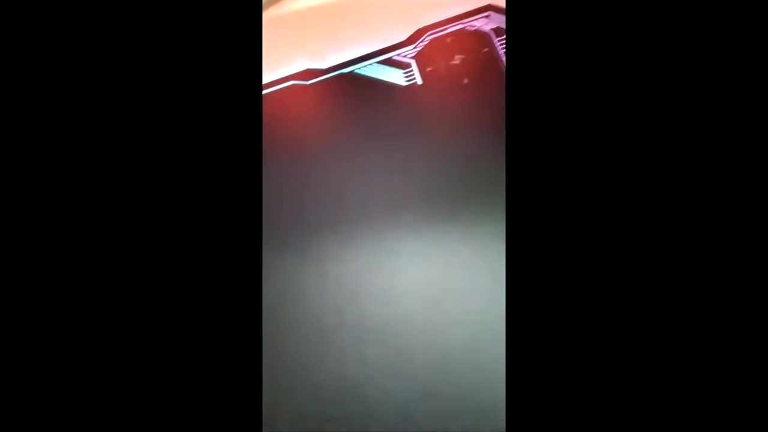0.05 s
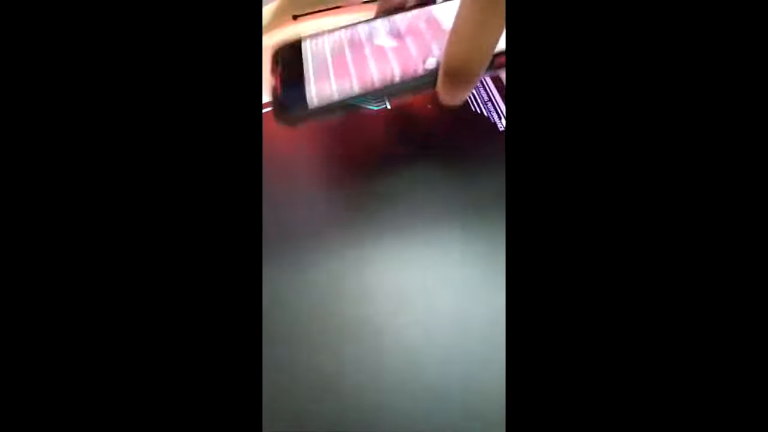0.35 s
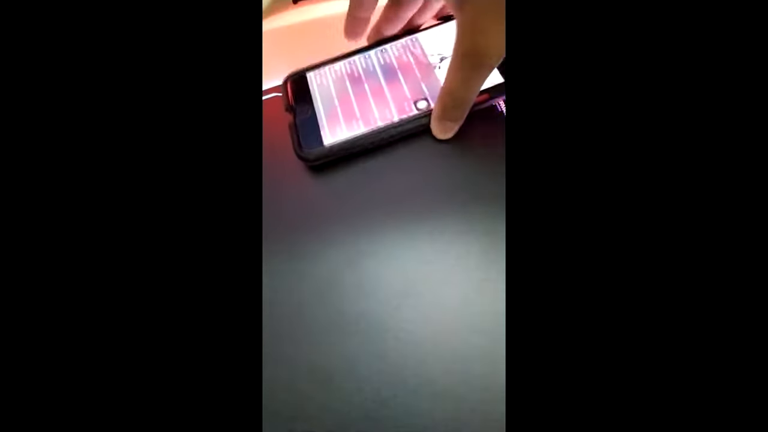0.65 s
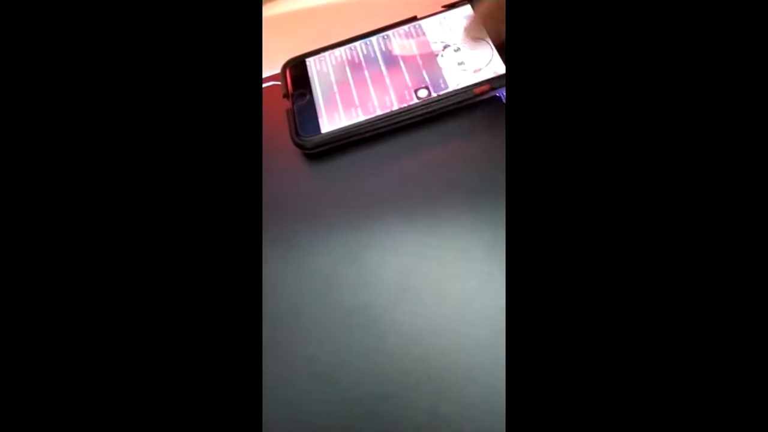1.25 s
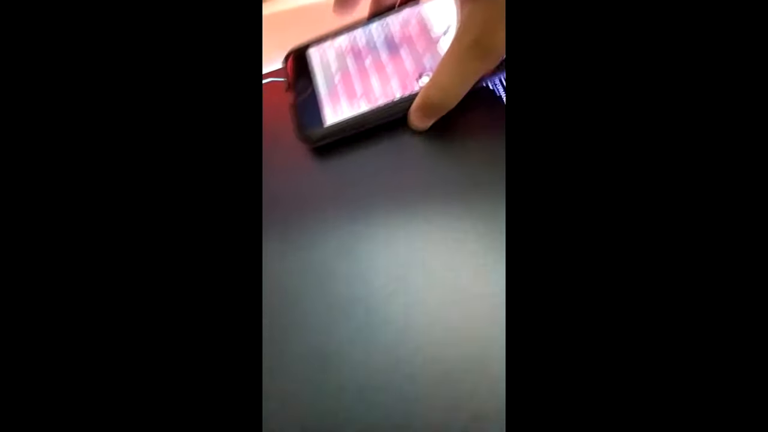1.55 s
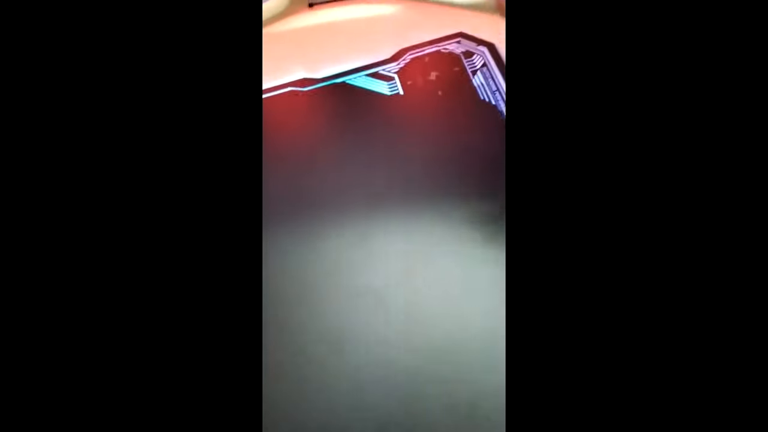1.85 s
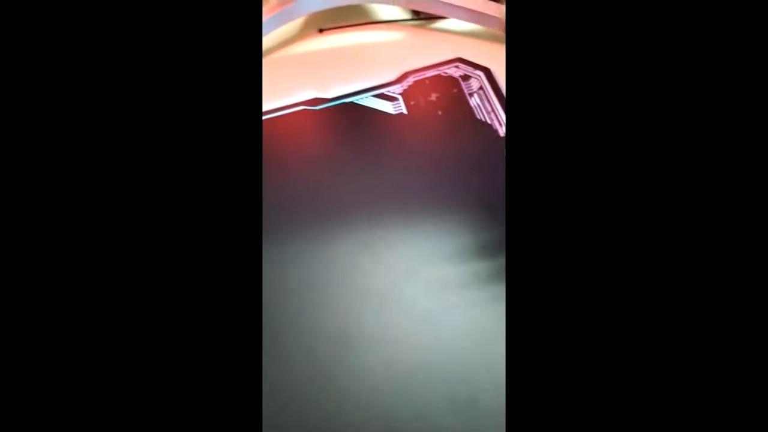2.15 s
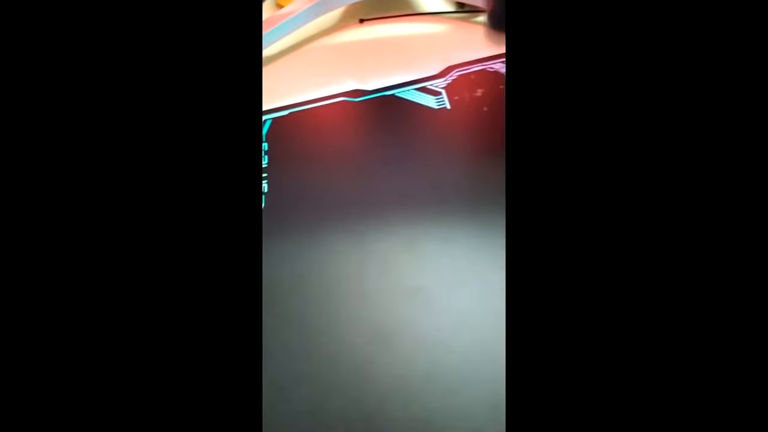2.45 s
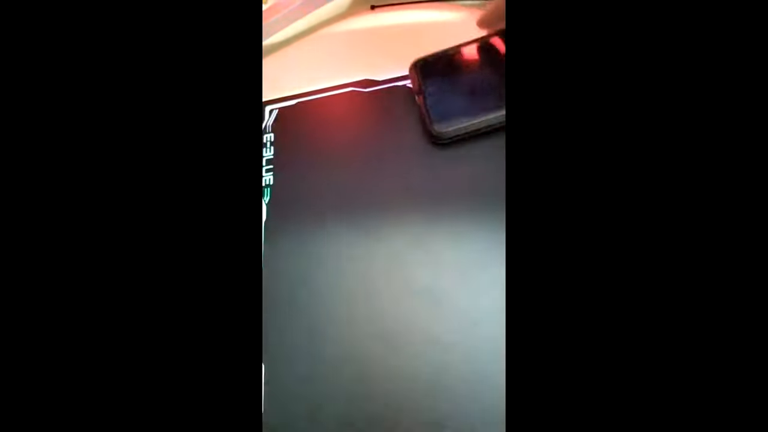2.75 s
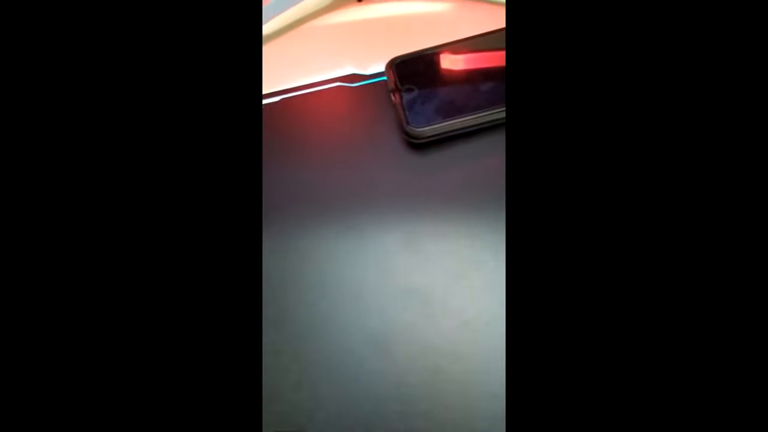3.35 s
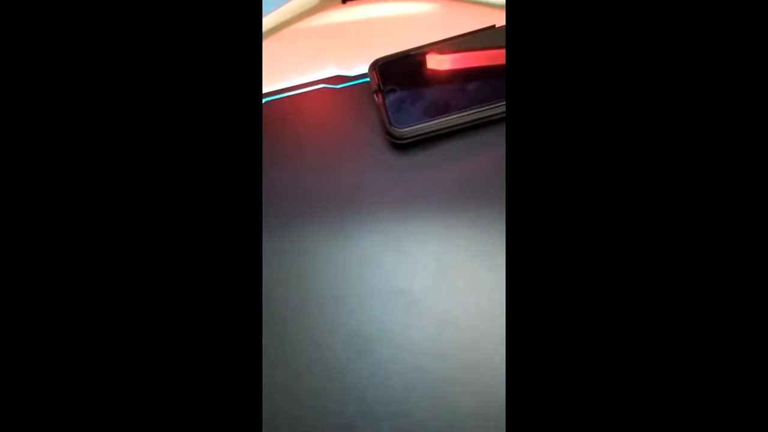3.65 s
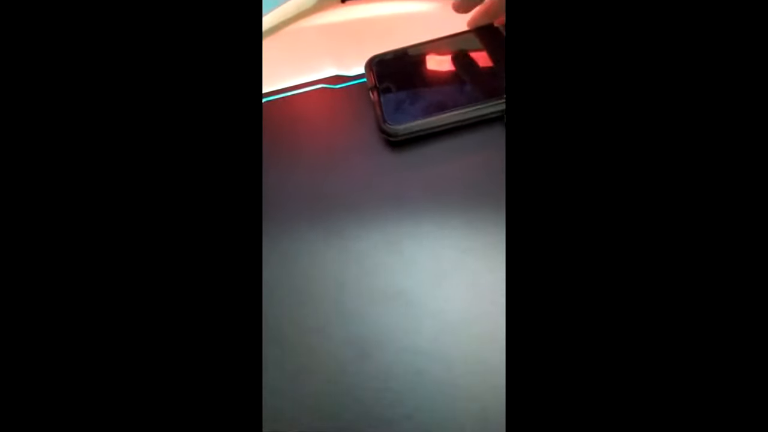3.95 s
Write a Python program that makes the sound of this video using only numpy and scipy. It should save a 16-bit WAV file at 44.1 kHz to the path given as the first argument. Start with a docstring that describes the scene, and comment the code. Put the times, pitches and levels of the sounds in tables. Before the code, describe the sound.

A phone in a plastic case is set down twice on a mouse pad, each time with a sharp clack and desk thud. Fingers rustle faintly in between. A fan hums in the small room, and air buffets the close microphone.

```python
"""A phone in a plastic case knocks down twice on a mouse pad, close to a two-port microphone.
The case snaps, chatters and rings; the desk booms under the pad. In between, fingers rustle on the case.
The small room adds a short tail. A fan hums throughout, a faint tone swells once,
and moving air buffets now one microphone port, now the other."""
import sys
import numpy as np
from scipy import signal
from scipy.fft import rfft, irfft
from scipy.io import wavfile

SR = 44100
rng = np.random.default_rng(int(sys.argv[2]) if len(sys.argv) > 2 else 0)


def wav_record(signal):
    """Record a signal, one row per channel, as 16-bit PCM in the file named by sys.argv[1]."""
    frames = np.transpose(np.atleast_2d(signal))
    bounded = np.clip(frames, -1, 1)
    # unit amplitude maps onto the largest positive 16-bit level
    quanta = np.round(bounded * 32767).astype(np.int16)
    wavfile.write(sys.argv[1], SR, quanta)


N = 176400
T = np.arange(N) / SR
FREQS = np.maximum(np.fft.rfftfreq(N, 1 / SR), 1)


def undb(db):
    """Decibels to gain."""
    return 10 ** (np.asarray(db) / 20)


def unit(x):
    """Scale to rms 1."""
    return x / np.sqrt(np.mean(x ** 2))


def colour(points, column=1):
    """Gain per FFT bin from rows of Hz and dB."""
    points = np.array(points, float)
    return undb(np.interp(np.log(FREQS), np.log(points[:, 0]), points[:, column]))


def noise(gain, channels=2):
    """Independent noises with the given spectrum, rms 1."""
    return unit(irfft(rfft(rng.standard_normal((channels, N))) * gain, N))


def wander(rate_hz):
    """Smooth random drift, rms 1."""
    return noise(1 / (1 + (FREQS / rate_hz) ** 4), channels=1)[0]


def burst(x, envelope):
    """Enveloped noise, scaled to the envelope's rms."""
    shaped = x * envelope
    return shaped * np.sqrt(np.mean(envelope ** 2) / np.mean(shaped ** 2, axis=-1, keepdims=True))


def swell(centre_s, sigma_s):
    """Gaussian envelope, peak 1."""
    return np.exp(-0.5 * np.minimum(((T - centre_s) / sigma_s) ** 2, 200))


def ring(hz, t60_s):
    """Impulse response of one mode."""
    t = T[:SR // 2]
    return np.sin(2 * np.pi * hz * t) * np.exp(-np.log(1000) * t / t60_s)


def room(x):
    """Add a short diffuse tail, different at each port."""
    # Reverberation bands. Each row: low edge in Hz, high edge in Hz, t60 in s, level in dB.
    bands = [(205, 1100, 0.42, -6.5), (823, 2300, 0.25, -5), (2300, 4500, 0.37, -5),
             (4460, 9000, 0.36, -6.5), (8800, 15000, 0.32, -9.5)]
    build_s = 0.0042
    t, tail = T[:SR // 2], 0
    for low_hz, high_hz, t60_s, db in bands:
        in_band = (FREQS >= low_hz) & (FREQS < high_hz)
        band = irfft(rfft(rng.standard_normal((2, N))) * in_band, N)[:, :len(t)]
        envelope = (1 - np.exp(-t / build_s)) * np.exp(-np.log(1000) * t / t60_s)
        tail = tail + undb(db) * band * envelope / np.sqrt(np.sum(envelope ** 2))
    return x + signal.fftconvolve(x, tail, axes=1)[:, :N]


def fan():
    """Steady rush, alike at both ports in the bass, plus wavering tones."""
    # Rush spectrum. Each row: frequency in Hz, left gain in dB, right gain in dB.
    spectrum = [(20, -4, -34), (49.7, 10, 4), (115, -7, -1.5), (181, 4, 4.5), (306, -1, -0.5),
                (362, -3.5, -4), (493, 0, -7.5), (803, -3, -6), (874, -11, -9.5), (1090, -4, -7.5),
                (1327, -10, -11.5), (2170, -19, -16.5), (2740, -19.5, -20), (3930, -26.5, -26.5),
                (6850, -34, -34.5), (10140, -37, -37.5), (13600, -46, -46.5), (16000, -60, -71)]
    # Fan tones. Each row: frequency in Hz, rms level in dB.
    hum = [(213, -60.5), (287, -57.5), (720, -62.5), (1104, -65.5)]
    rush_db, shared_low_hz, shared_high_hz = -41.5, 70, 500
    coherence = 1 / (1 + (FREQS / shared_high_hz) ** 4) / (1 + (shared_low_hz / FREQS) ** 4)
    shared = rfft(rng.standard_normal(N))
    per_port = rfft(rng.standard_normal((2, N)))
    gains = np.array([colour(spectrum), colour(spectrum, column=2)])
    rush = unit(irfft(gains * (np.sqrt(coherence) * shared + np.sqrt(1 - coherence) * per_port), N))
    tones = sum(undb(db) * np.sqrt(2) * np.sin(2 * np.pi * hz * T + 1.35 * wander(rate_hz=3.34))
                for hz, db in hum)
    return undb(rush_db) * rush + tones


def faint_tone():
    """One soft, short tone swells out of the hum."""
    hz, peak_db = 656, -42.5
    tone = np.sin(2 * np.pi * hz * T + 0.5 * wander(rate_hz=25))
    return undb(peak_db) * swell(centre_s=1.94, sigma_s=0.015) * tone


def buffeting():
    """Eddies rumble on each port separately; stronger ones arrive as soft low puffs."""
    # Draught on each port. Each row: time in s, level in dB.
    draught_left = [(0, -72), (.7, -38), (1, -52), (1.22, -39.5), (1.55, -51), (2.1, -60), (2.25, -31.5),
                    (2.48, -41.5), (2.6, -30), (2.9, -33), (3.05, -49), (3.55, -58), (3.66, -32.5),
                    (3.75, -50), (4, -39)]
    draught_right = [(0, -23.5), (.2, -44), (0.349, -29), (.5, -41), (.75, -29.5), (1, -37), (1.15, -29),
                     (1.38, -37.5), (1.5, -32), (1.78, -32.5), (1.93, -68), (2.2, -58), (2.38, -36),
                     (2.48, -40), (2.8, -28.5), (2.94, -40), (3.08, -32.5), (3.45, -35.5), (3.62, -36),
                     (4, -29.5)]
    # Draught spectrum. Each row: frequency in Hz, gain in dB.
    spectrum = [(20, -49), (35, -18), (52, 4), (80, -0.5), (130, -5.5), (220, -13.5), (400, -32.5),
                (900, -67), (3000, -74)]
    # Air puffs. Each row: centre in s, sigma in s, level in dB, peak in Hz, port (0 left, 1 right).
    puffs = [(.008, 0.0079, -21, 105, 1), (.043, 0.001, -24, 131, 1), (.283, 0.013, -31.5, 76, 0),
             (0.367, 0.0092, -21, 126, 1), (0.38, 0.0034, -23, 286, 1), (0.579, 0.016, -26, 69, 1),
             (0.702, 0.01, -22.5, 92.5, 1), (.762, 0.015, -25.5, 69, 1), (0.822, 0.009, -20, 85, 1),
             (1.159, 0.0076, -28.5, 115, 1), (1.184, 0.0019, -31.5, 330, 1), (1.737, 0.0039, -17.5, 95, 1),
             (2.226, 0.014, -24, 67, 0), (2.289, 0.011, -26, 72, 0), (2.377, 0.0067, -21.5, 98, 0),
             (2.561, 0.0082, -23, 116, 0), (2.627, 0.0093, -28, 83.4, 0), (2.715, 0.01, -26.5, 64, 1),
             (2.757, 0.0075, -17.5, 128, 0), (2.86, 0.008, -27, 88.5, 1), (2.889, 0.011, -24.5, 84, 0),
             (3.005, 0.0053, -22.5, 113, 1), (3.026, 0.0032, -20.5, 109, 1), (3.13, 0.01, -33, 153, 1),
             (3.175, 0.0024, -21, 240, 1), (3.564, 0.013, -19.5, 96, 1), (3.596, 0.016, -24, 178, 1),
             (3.655, 0.048, -27.5, 89, 1), (3.671, 0.0052, -26.5, 283, 1), (3.788, 0.0041, -30.5, 172, 1),
             (3.895, 0.01, -20, 113, 1), (3.954, 0.0066, -29, 97, 0)]
    eddy_db = 3
    levels_db = [np.interp(T, *np.array(curve).T) + eddy_db * wander(rate_hz=14.5)
                 for curve in (draught_left, draught_right)]
    out = noise(colour(spectrum)) * undb(levels_db)
    for centre_s, sigma_s, db, peak_hz, port in puffs:
        offset_oct = np.log2(FREQS / peak_hz)
        air = noise(1 / (1 + offset_oct ** 2) ** 4, channels=1)[0]
        out[port] += undb(db) * burst(air, swell(centre_s, sigma_s))
    return out


def finger_rubs():
    """Skin slides over the case with a grainy hiss; each stroke has its own brightness."""
    # Finger strokes. Each row: centre in s, sigma in s, level in dB, tilt in dB per octave.
    strokes = [(1.434, 0.016, -61, 5), (1.522, 0.052, -61.5, -1.5), (1.563, 0.02, -61.5, 3),
               (2.242, 0.057, -69, 0), (2.672, .012, -63.5, -2)]
    # Friction spectrum. Each row: frequency in Hz, gain in dB.
    spectrum = [(1000, -3), (3000, -3), (4500, 7), (6500, -4), (8700, 7), (12500, -3), (16000, -10)]
    grain_db = 2
    out = np.zeros((2, N))
    for centre_s, sigma_s, db, tilt_db_oct in strokes:
        hiss = noise(colour(spectrum) * undb(tilt_db_oct * np.log2(FREQS)))
        grain = undb(grain_db * wander(rate_hz=400))
        out += undb(db) * swell(centre_s, sigma_s) * unit(hiss * grain)
    return out


def desk_thuds():
    """Each landing rings the desk: a soft flat push favours low modes, an edge higher ones."""
    # Landings on the pad. Each row: start in s, gain in dB, low and high edge of the push in Hz.
    landings = [(.6122, -13, 30, 337), (.7, -22.5, 50, 305), (2.763, -19, 450, 850),
                (2.7874, -19, 169, 990), (2.7965, -11.5, 290, 754)]
    # Desk modes. Each row: frequency in Hz, level in dB, t60 in s, left minus right in dB.
    modes = [(119.7, -3.5, 0.21, -1.5), (171, -15, 0.11, -3), (232, -20.5, 0.059, 0),
             (283.5, -5.5, 0.14, -3), (367, -18.5, 0.15, -1), (413, -3.5, 0.022, 6.5),
             (507, -6.5, 0.064, 7.5), (576, -48, 0.074, 3), (776, -24.5, 0.15, -5), (1030, -25, 0.14, -15),
             (1126, -10, 0.029, -18)]
    desk = sum(undb(db + np.array([[pan_db], [-pan_db]]) / 2) * ring(hz, t60_s)
               for hz, db, t60_s, pan_db in modes)
    out = np.zeros((2, N))
    for start_s, db, low_hz, high_hz in landings:
        push = np.vstack([signal.butter(1, low_hz, "highpass", fs=SR, output="sos"),
                          signal.butter(4, high_hz, fs=SR, output="sos")])
        start = int(start_s * SR)
        out[:, start:start + desk.shape[1]] += undb(db) * signal.sosfilt(push, desk)
    return out


def brightness(hz, tilt_db_oct, cutoff_hz):
    """Gain of a contact: tilt about 5 kHz, then a low-pass."""
    return undb(tilt_db_oct * np.log2(hz / 5000)) / np.hypot(1, (hz / cutoff_hz) ** 4)


def case_clacks():
    """Each hard contact gives a sharp snap, milliseconds of chatter and a brief ring of the case."""
    # Contacts. Each row: start in s, level in dB, chatter hold in s, tilt in dB per octave, cutoff in Hz.
    contacts = [(0.6118, -23.5, 0.0015, 0, 11300), (0.668, -37.5, 0.0016, 2.5, 11000),
                (0.701, -48, 0.0018, -3, 11000), (0.722, -51, 0.00092, -2, 11000),
                (1.538, -48.5, 0.0012, 2, 9000), (2.7615, -37, 0.0012, 0.5, 13000),
                (2.7868, -20.5, 0.0011, 3.5, 15000), (2.7887, -17.5, 0.0018, -0.4, 17000),
                (2.87, -40.5, 0.005, -4, 11000), (2.9328, -55, 0.00073, -2, 12000)]
    # Clack spectrum. Each row: frequency in Hz, gain in dB.
    spectrum = [(300, -19), (900, 5), (1400, 3.5), (2100, -6.5), (2700, 3), (3400, 2), (4400, -3.5),
                (6300, -1), (7700, 1), (9300, 3), (11500, -1.5), (13500, -6.5), (16000, -11)]
    # Case modes. Each row: frequency in Hz, relative level in dB, t60 in s.
    modes = [(1257, -3, 0.013), (2486, -18, 0.12), (2690, -19, .1), (2810, -23, 0.026), (3160, -16, 0.098),
             (3600, -22, 0.016), (4900, -25, 0.046), (5240, -15, 0.026), (7040, -22, .03),
             (7810, -13, 0.017), (8730, -21, 0.045), (9300, -18, .02), (10470, -18, .05),
             (10400, -26, 0.025)]
    attack_s, decay_s, flutter_db, ring_db = 0.0003, 0.0016, 3.5, -2
    snap_re_chatter_db, snap_cutoff_hz, left_lag_s = -7.5, 9000, 0.00002
    out = np.zeros((2, N))
    for start_s, db, hold_s, tilt_db_oct, cutoff_hz in contacts:
        gain = colour(spectrum) * brightness(FREQS, tilt_db_oct, cutoff_hz)
        mid, side = noise(gain) * undb(flutter_db * wander(rate_hz=3100))
        attack = 1 - np.exp(-np.maximum(T - start_s, 0) / attack_s)
        decay = np.exp(-np.maximum(T - start_s - hold_s, 0) / decay_s)
        chatter = burst(np.array([mid + side, mid - side]), attack * decay)

        arrival_s = start_s + attack_s + np.array([[left_lag_s], [0]])
        snap_gain = gain / np.hypot(1, FREQS / snap_cutoff_hz)
        snap = unit(irfft(snap_gain * np.exp(-2j * np.pi * FREQS * arrival_s), N))
        out += undb(db) * (chatter + undb(snap_re_chatter_db) * np.std(chatter) * snap)

        for hz, mode_db, t60_s in modes:
            mode = undb(db + ring_db + mode_db) * brightness(hz, tilt_db_oct, cutoff_hz) * ring(hz, t60_s)
            for port, lag_s in enumerate(rng.random(2) * hold_s / 2):
                start = int((start_s + lag_s) * SR)
                out[port, start:start + len(mode)] += mode
    return out


def scene():
    """The phone in the room, over the fan and the air on the ports."""
    phone = case_clacks() + desk_thuds() + finger_rubs()
    return room(phone) + fan() + faint_tone() + buffeting()


def record(dry):
    """Cut the deepest bass and the top treble."""
    low_hz, high_hz = 35, 15700
    highpass = signal.butter(4, low_hz, "highpass", fs=SR, output="sos")
    lowpass = signal.ellip(8, 0.2, 80, high_hz, fs=SR, output="sos")
    return signal.sosfilt(lowpass, signal.sosfilt(highpass, dry))


dry = scene()
out = record(dry)
wav_record(out)
```